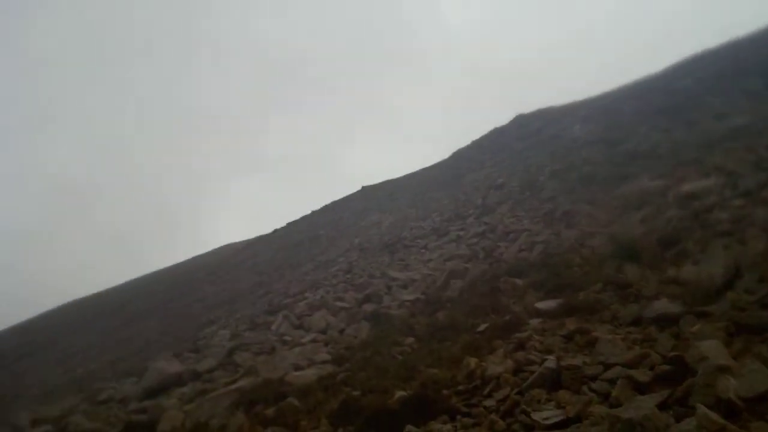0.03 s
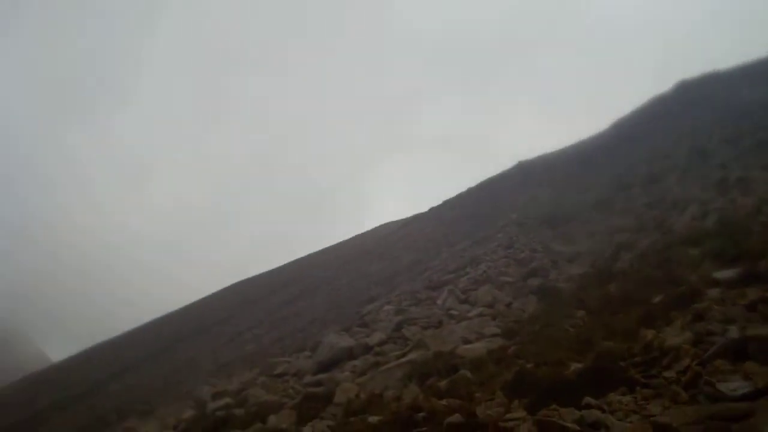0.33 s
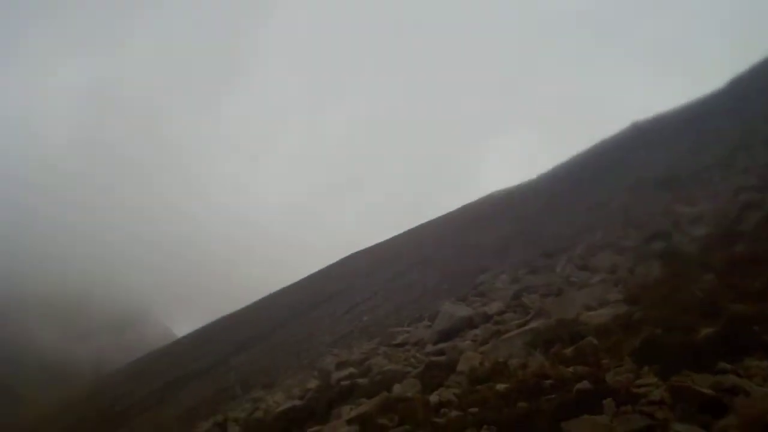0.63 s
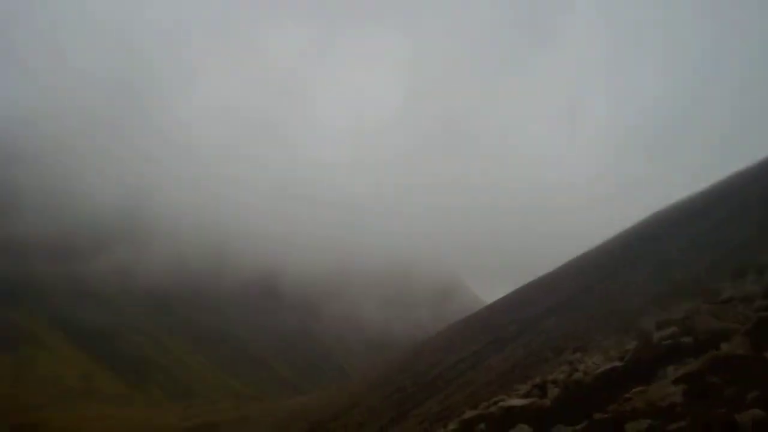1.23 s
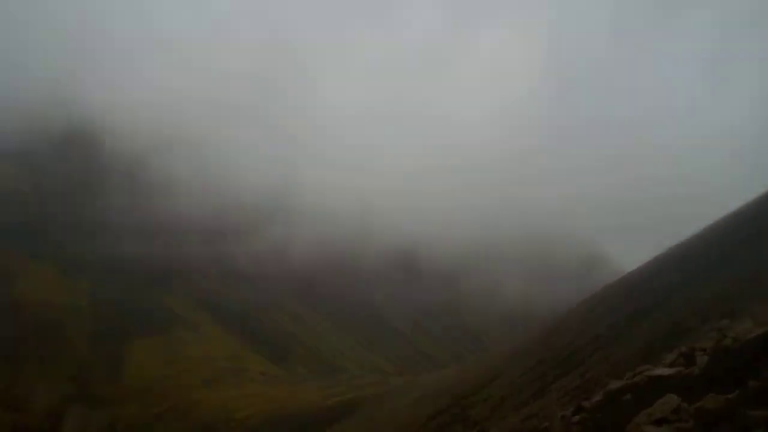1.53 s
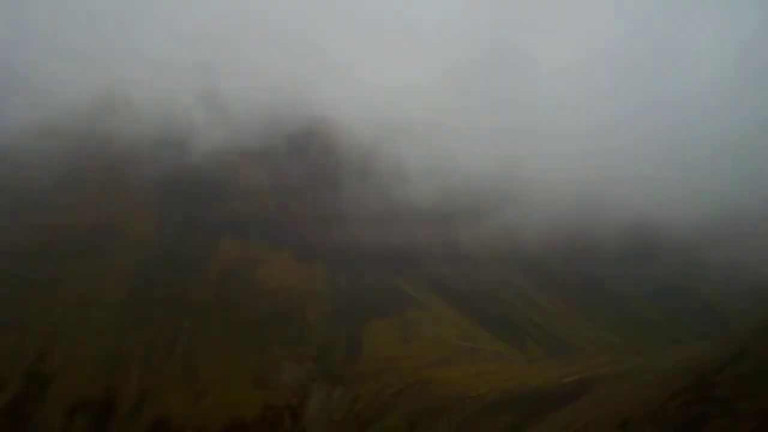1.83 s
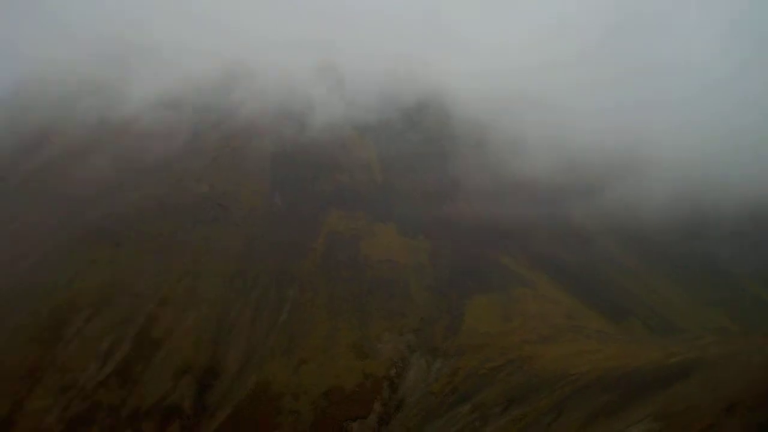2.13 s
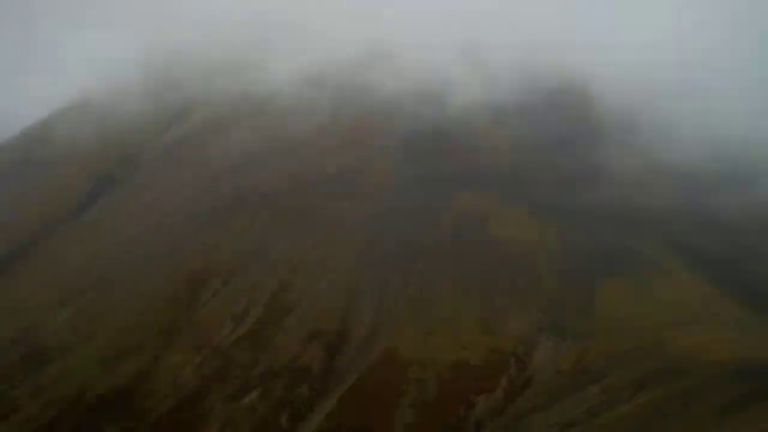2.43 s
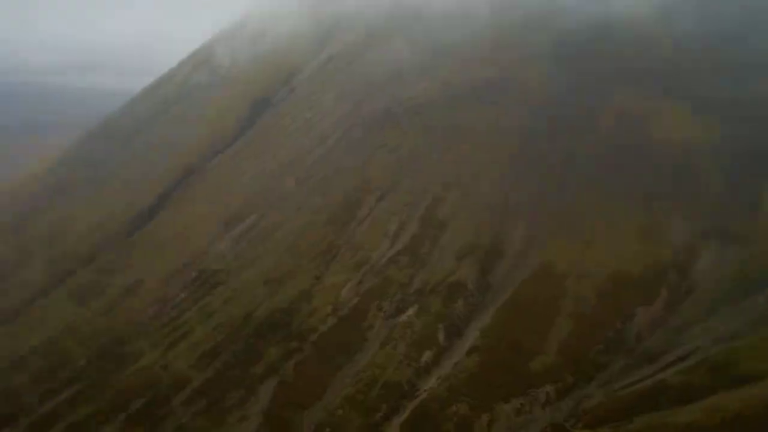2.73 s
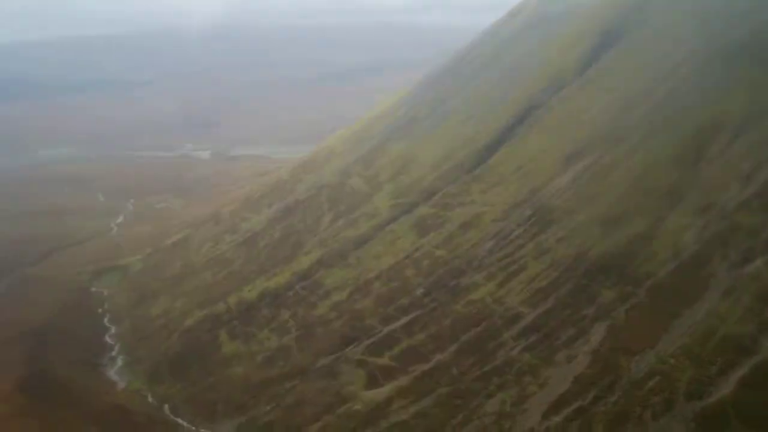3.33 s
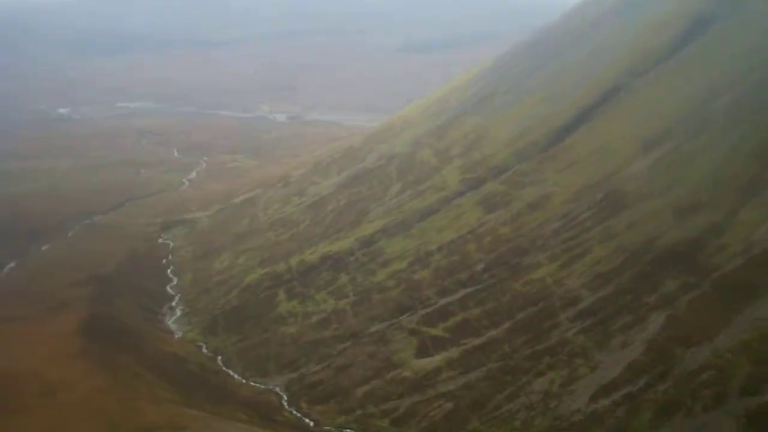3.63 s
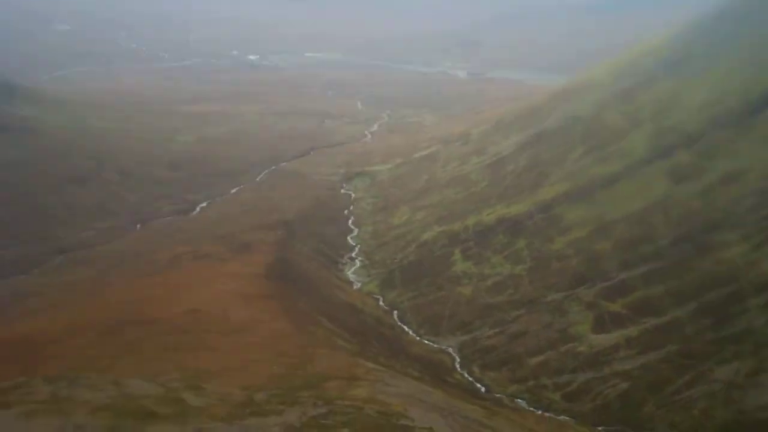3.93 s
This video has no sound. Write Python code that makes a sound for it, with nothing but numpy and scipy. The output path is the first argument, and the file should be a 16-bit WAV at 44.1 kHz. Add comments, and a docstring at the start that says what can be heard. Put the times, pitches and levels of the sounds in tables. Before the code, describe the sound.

Strong wind buffets the microphone on an open mountainside, making a heavy, overloaded rumble. Early gusts choke briefly, a few dull bumps jolt the camera, and the crackle grows denser as the wind rises halfway through.

```python
"""A heavy, crackling rumble: strong mountainside gusts blow straight onto a camera's microphone.
Turbulence overloads the input nearly all the time; clipping squares off the rumble and makes the
crackle, denser as the wind rises. Slow shoves of air pin the input and briefly choke the sound.
A few short bumps jolt the camera."""
import sys
import numpy as np
from scipy import signal
from scipy.fft import rfft, irfft, next_fast_len
from scipy.io import wavfile
from scipy.ndimage import map_coordinates

SR = 44100
rng = np.random.default_rng(int(sys.argv[2]) if len(sys.argv) > 2 else 0)


def waveform_to_disk(signal):
    """Save audio, clipped to [-1, 1], as 16-bit WAV at the path in sys.argv[1]."""
    frames = np.transpose(np.atleast_2d(signal))
    scaled = np.clip(frames, -1, 1) * 32767
    samples = np.round(scaled).astype(np.int16)
    wavfile.write(sys.argv[1], SR, samples)


N = 176400

# wind strength, drives the smaller eddies and the hiss: t/s, level/dB
WIND_DB = [(0, -11), (.27, 3.5), (.42, -2.5), (.56, -4.5), (.76, -12), (.88, 6), (1.03, -2), (1.12, 3.5),
           (1.35, 7), (1.4, -22), (1.56, -10), (1.61, 6), (1.84, 6), (1.95, 11), (2.16, 6), (2.175, 19.5),
           (2.25, 14), (2.275, 25.5), (2.325, 24), (2.38, 16), (2.525, 24.5), (2.66, 18), (2.72, 11),
           (3.0, 11), (3.09, 15), (3.27, 16.5), (3.33, 5.5), (3.51, 9), (3.57, 16), (3.64, 10), (3.78, 12),
           (3.88, 26), (4, 14.5)]
# slow, heavy buffeting that overloads the input: t/s, level/dB
BUFFETING_DB = [(0, 6.5), (.42, 6), (.7, 4), (.85, 11), (1.03, 6.5), (1.33, 10.5), (1.44, 0), (1.62, 11),
                (1.95, 10.5), (2.13, 12.5), (2.65, 13.5), (2.8, 11), (3.25, 8.5), (3.65, 10.5), (3.85, 15),
                (4, 13)]
# shoves of air: start t/s, length/s, direction (+-1)
AIR_SHOVES = [(0.648, 0.023, -1), (0.695, 0.049, 1), (0.831, 0.018, -1), (1.169, 0.023, -1),
              (1.185, 0.039, 1), (1.297, .021, 1), (1.489, 0.017, -1), (1.517, 0.044, 1),
              (1.571, 0.026, -1)]
# bumps on the camera: centre t/s, length/s, level/dB
CAMERA_BUMPS = [(.028, 0.0061, 4.5), (0.427, 0.01, 5), (0.868, 0.0064, 7.5), (.879, 0.0068, 14.5),
                (0.922, .006, 6), (1.106, 0.031, 7.5), (1.2308, 0.0047, 25.5), (1.278, 0.023, 4),
                (1.344, 0.022, 10), (1.773, 0.0025, 23), (1.861, 0.0057, 16), (2.069, 0.027, 16),
                (3.38, 0.0093, 15), (3.567, 0.017, 14.5)]
# noise spectra, relative density: f/Hz, level/dB
HISS_SPECTRUM = [(100, 4.5), (600, 9), (1500, -3), (4000, -10), (8000, -12), (16000, -12.5)]
BUMP_SPECTRUM = [(40, 0.5), (200, 3.5), (500, -2), (900, -10), (2000, -49.5), (6000, -53), (16000, -91)]
RUMBLE_SPECTRUM = [(5, -14), (14, -1), (28, -1), (55, -2), (90, -8), (160, -24.5), (400, -55), (1000, -120)]
EDDY_SPECTRUM = [(25, -21.5), (70, -2.5), (120, -1.5), (200, -4.5), (320, -14), (640, -40), (1500, -50),
                 (4000, -120)]
FLUTTER_SPECTRUM = [(80, -18.5), (250, -3.5), (500, 0), (1000, -10.5), (2000, -23.5), (4000, -42),
                    (8000, -60), (16000, -83)]
# recorder's treble droop: f/Hz, level/dB
TREBLE_DROOP = [(1000, -1), (5000, -.5), (10000, -2.5), (16000, -3.5)]


def amp(db):
    """Decibels to gain."""
    return 10 ** (np.asarray(db) / 20)


def gain_at(spectrum, hz):
    """Gain from (f/Hz, level/dB) points on a log frequency axis."""
    points_hz, points_db = np.transpose(spectrum)
    return amp(np.interp(np.log(hz + 1), np.log(points_hz + 1), points_db))


def filtered(x, gain):
    """Apply gain(hz) by zero-padded FFT."""
    size = next_fast_len(len(x) + 8192)
    hz = np.fft.rfftfreq(size, 1 / SR)
    return irfft(rfft(x, size) * gain(hz), size)[:len(x)]


def noise(spectrum):
    """Coloured noise, rms 1."""
    x = filtered(rng.standard_normal(N), lambda hz: gain_at(spectrum, hz))
    return x / x.std()


def wobble(knots_per_s):
    """Smooth random curve."""
    knots = rng.standard_normal(N // 100)
    return map_coordinates(knots, [np.arange(N) * knots_per_s / SR], mode="wrap")


def hiss(wind_db):
    """Faint hiss, rising slightly with the wind."""
    return noise(HISS_SPECTRUM) * amp(-33.5 + 0.11 * wind_db)


def bumps(t):
    """Short, dull jolts to the camera; no ring."""
    envelope = np.zeros(N)
    for centre_s, length_s, level_db in CAMERA_BUMPS:
        offset = np.clip((t - centre_s) / length_s, -.5, .5)
        envelope += amp(level_db) * np.cos(np.pi * offset) ** 2
    return envelope * noise(BUMP_SPECTRUM)


def shoves(t, level_db=15, edge_s=0.0081):
    """Each shove of air rises smoothly, holds the pressure far to one side and lets go."""
    push = np.zeros(N)
    for start_s, length_s, direction in AIR_SHOVES:
        inside_s = np.minimum(t - start_s, start_s + length_s - t)
        ramp = np.clip(inside_s / edge_s + .5, 0, 1)
        push += direction * np.sin(np.pi / 2 * ramp) ** 2
    return amp(level_db) * push


def turbulence(t, wind_db):
    """Big (rumble), middling and small (flutter) eddies surge together; small ones grow fastest."""
    buffeting_db = np.interp(t, *np.transpose(BUFFETING_DB))
    surge_db = wobble(knots_per_s=45)
    rumble = noise(RUMBLE_SPECTRUM) * amp(buffeting_db + surge_db)
    eddies = noise(EDDY_SPECTRUM) * amp(-2.5 + 0.8 * wind_db + 3 * surge_db)
    flutter = noise(FLUTTER_SPECTRUM) * amp(-24 + 1.516 * wind_db + 4.5 * surge_db)
    return rumble + eddies + flutter


def scene():
    """Pressure on the microphone, mono."""
    t = np.arange(N) / SR
    wind_db = np.interp(t, *np.transpose(WIND_DB))
    return (turbulence(t, wind_db) + hiss(wind_db) + shoves(t) + bumps(t))[None]


def record(dry):
    """The input clips hard on both sides; the treble droops and ends at the band limit."""
    ceiling, oversampling, top_hz = 0.78, 4, 16400
    upsampled = signal.resample_poly(dry[0], oversampling, 1)
    clipped = signal.resample_poly(np.clip(upsampled, -ceiling, ceiling), 1, oversampling)
    return filtered(clipped, lambda hz: gain_at(TREBLE_DROOP, hz) / (1 + (hz / top_hz) ** 80))[None]


dry = scene()
out = record(dry)
waveform_to_disk(out)
```